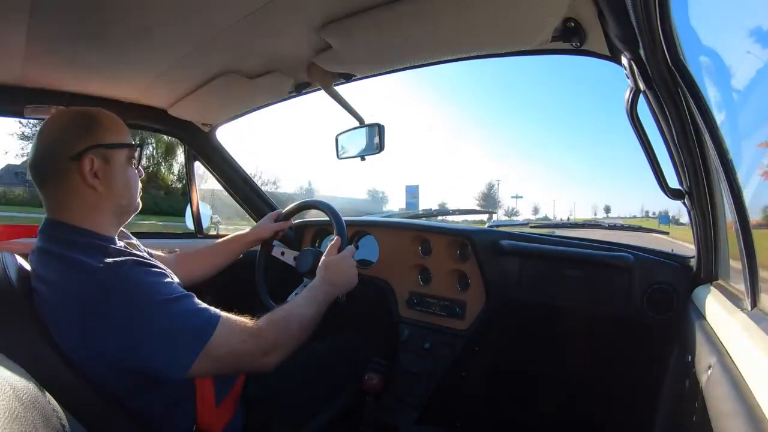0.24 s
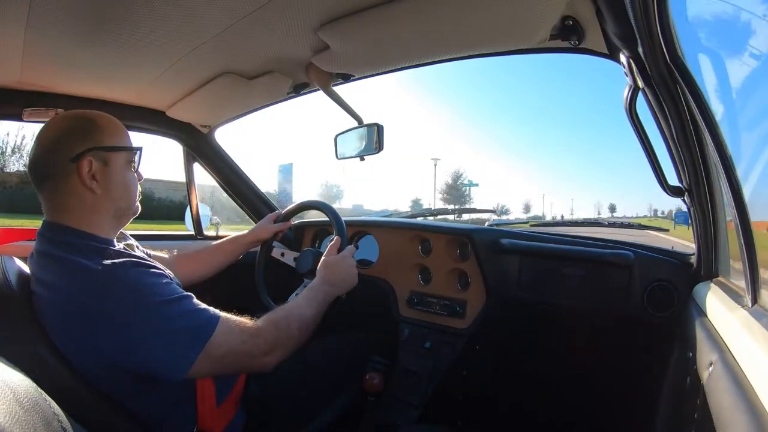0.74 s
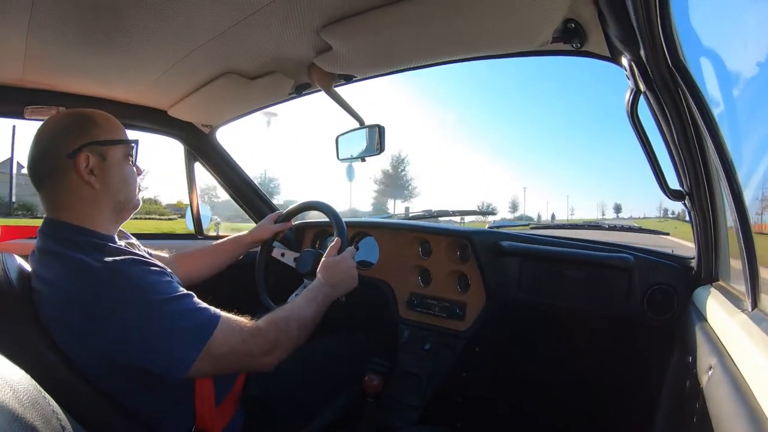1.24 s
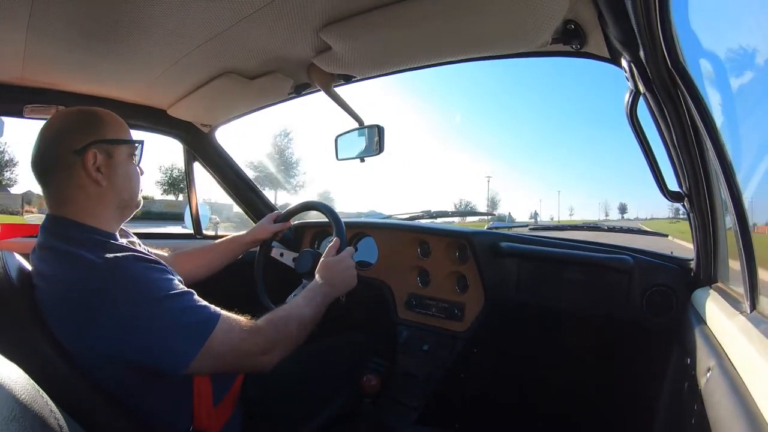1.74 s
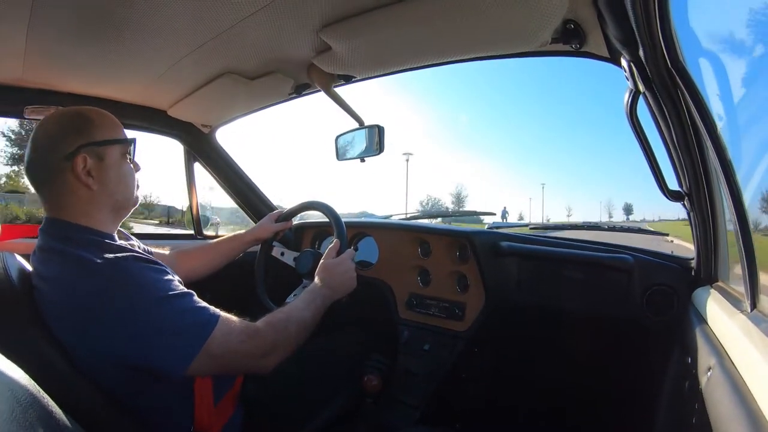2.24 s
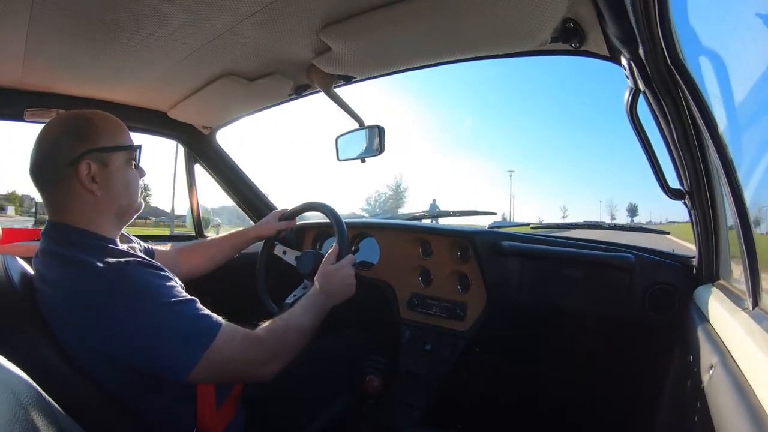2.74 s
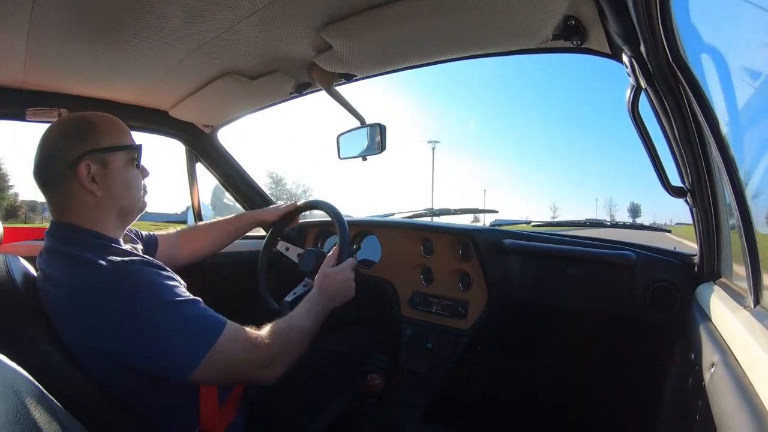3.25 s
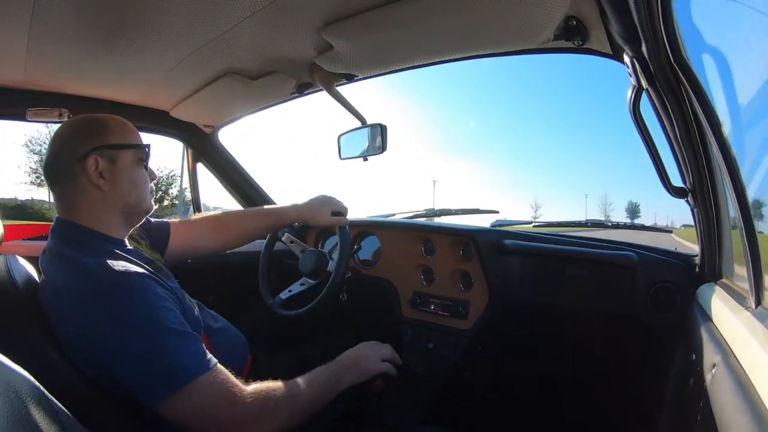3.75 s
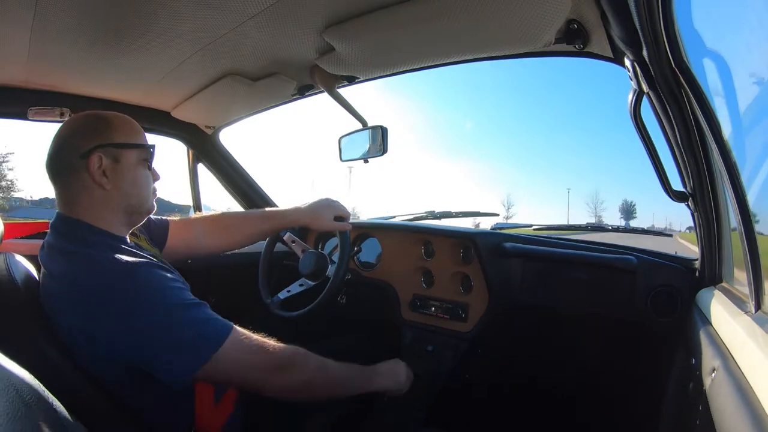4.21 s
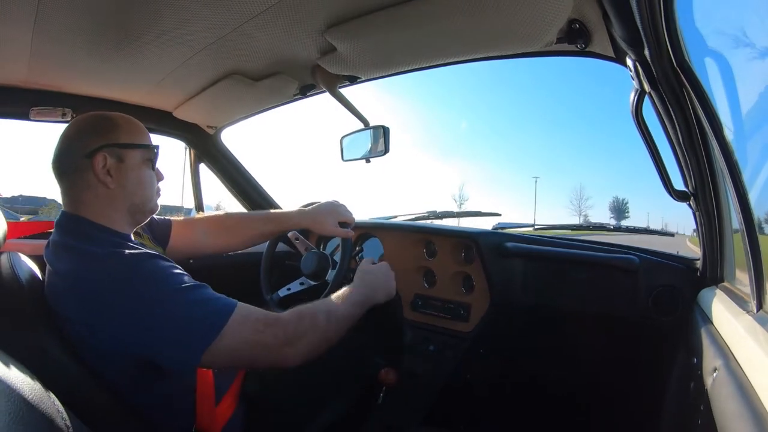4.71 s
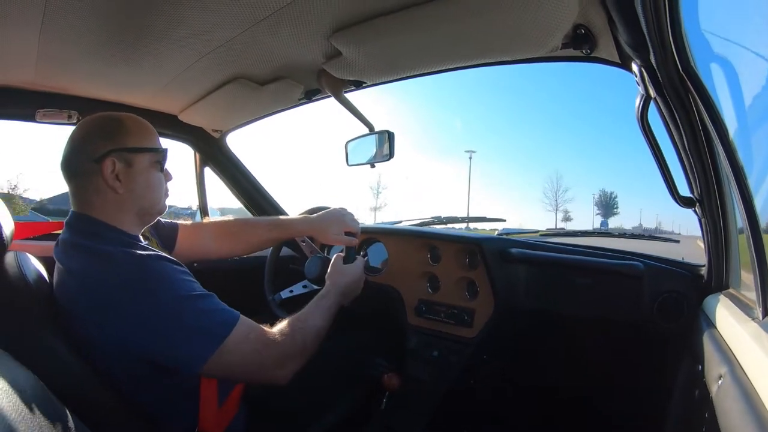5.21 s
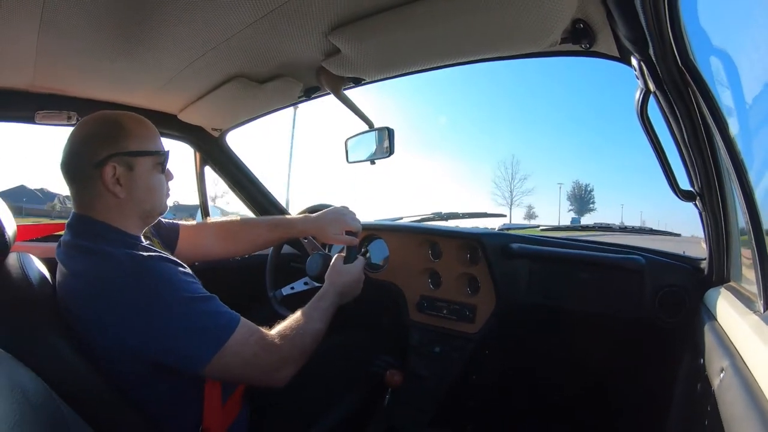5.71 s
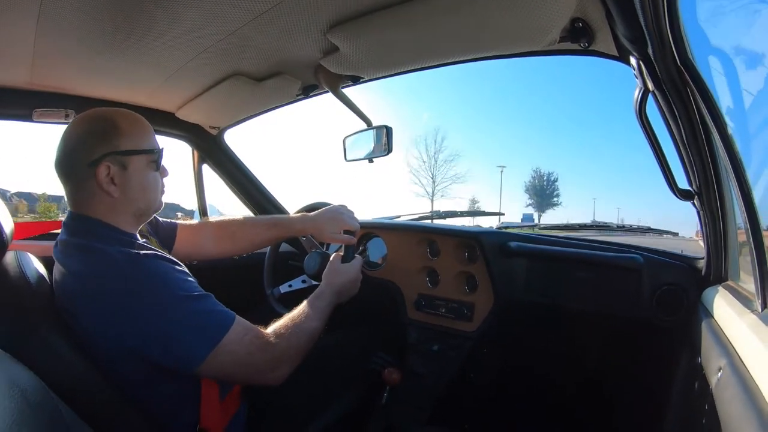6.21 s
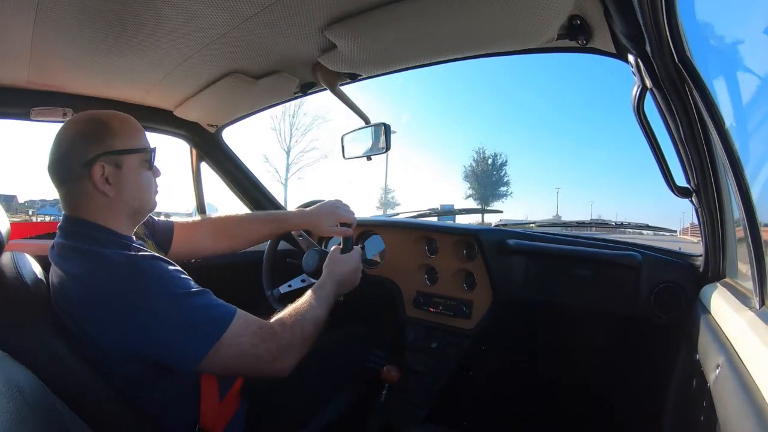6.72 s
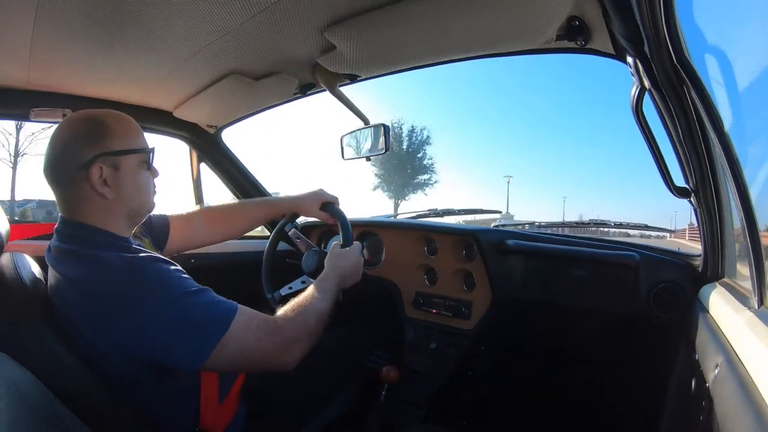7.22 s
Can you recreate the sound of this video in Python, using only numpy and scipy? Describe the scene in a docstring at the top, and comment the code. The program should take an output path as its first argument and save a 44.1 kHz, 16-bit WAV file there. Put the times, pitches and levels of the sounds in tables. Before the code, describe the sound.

A raspy flat-four engine heard from within the cabin, with tyre rumble, fan rush and faint trim ticks. It pulls steadily for two seconds, goes off throttle and drops slightly. A downshift follows: the boom thins, linkage knocks, revs jump, dip and get dragged up to a higher note, which gradually declines. Stereo microphone inside, dry and close, with short reflections from glass and dashboard.

```python
"""A flat-four engine pulls hard over deep road rumble, heard inside an old car on the road.
It is let off, blips through a downshift, then runs on at higher revs with a deep boom.
Engine, gears and intake are sums of tones locked to one crankshaft angle.
Road, fan, tyres and gulped air are shaped noise; loose trim and knocks are short decaying bursts."""
import sys
import numpy as np
from scipy import signal
from scipy.fft import rfft, irfft, next_fast_len
from scipy.io import wavfile
from scipy.ndimage import uniform_filter1d, minimum_filter1d, map_coordinates

SR = 44100
rng = np.random.default_rng(int(sys.argv[2]) if len(sys.argv) > 2 else 0)


def unload_wav(signal):
    """Save mono or channel-first audio to the path in sys.argv[1] as 16-bit WAV at rate SR, clipped to [-1, 1]."""
    wavfile.write(
        sys.argv[1],
        SR,
        np.round(np.clip(np.atleast_2d(signal).T, -1, 1) * 32767).astype(np.int16),
    )


N = 328986
T = np.arange(N) / SR
HZ = np.fft.rfftfreq(N, 1 / SR)

# Envelopes: start/s, rise/s, hold/s, fall/s
CLUTCH_OUT = (4.1, 0.364, 0.21, 0.13)  # clutch pressed for the downshift
BLIP = (4.3, 0.18, 0.2, 0.16)  # stab of throttle between gears
DRAG = (4.81, 0.51, .1, 0.31)  # wheels drag the engine up to lower-gear speed
SHUDDER = (4.05, 0.16, 0.5, .1)  # body wobble around the gear change

# Throttle opening: t/s, opening/0-1
THROTTLE = [(0, 0.99), (1.95, 0.84), (2.17, 0.52), (2.48, 0), (7.46, 0)]
# Exhaust lines; half multiples come from unequal cylinders:
# multiple of crank speed, pulling level/dB rel., light-throttle level/dB rel.
EXHAUST_ORDERS = [(2.5, -42.5, -40), (3.0, -34, -40), (3.5, -30.5, -34.5), (4.0, -27, -38.5),
                  (4.5, -26, -36.5), (5.0, -31, -41), (5.5, -35.5, -45), (6.0, -18, -33.5),
                  (6.5, -45, -43.5), (7.0, -43, -47), (7.5, -32, -37.5), (8.0, -32, -42.5),
                  (8.5, -33, -41.5), (10.0, -47, -42.5), (11.0, -37, -42.5), (12.0, -37, -36),
                  (12.5, -34.5, -41), (13.0, -44, -38.5), (14.0, -52, -39.5), (16.0, -47, -46.5),
                  (17.0, -53.5, -45)]
# Cabin response to those lines: f/Hz, gain/dB
CABIN_GAIN = [(100.0, 10), (125.0, 7), (150.0, -2.5), (175.0, -5.5), (200.0, -2), (220.0, -4.5),
              (237.0, 5.5), (256.0, -7), (266.0, -9), (300.0, -2), (340.0, -7), (400.0, -6), (470.0, -11.5),
              (620.0, -20.5), (750.0, -6.5), (900.0, -26)]
# Boom swells and dips: t/s, half width/s, level change/dB
BOOM_WAVERS = [(.43, .06, 2.5), (.57, 0.084, -3.5), (.81, 0.058, 5), (1.08, .05, -3), (1.72, .03, -1),
               (2.03, .06, 4), (2.12, .04, -4.5), (2.43, 0.042, -6.5), (2.73, .06, 2.5), (2.815, 0.014, -5),
               (3.55, .08, -0.5), (3.95, 0.18, 2.5), (4.31, 0.036, 7.5), (5.19, 0.027, -5.5),
               (6.3, 0.16, -1.2), (6.7, 0.14, 0.7)]
ORDER_SCATTER_TURNS = .45  # full range of random phase
PIPE_SMEAR_TURNS_PER_ORDER2 = .05  # the pipe delays higher orders more, smearing each throb
FLUTTER_PER_ORDER, CYCLE_SPREAD_DB = .014, 1.1  # no two cycles fire equally hard


def exhaust(speed, turns):
    """Two firings a turn boom; higher and half orders bunch into one uneven throb per camshaft turn."""
    waver_db = 0.46 * drift(rate_hz=9.9)
    for s, width, db in BOOM_WAVERS:
        waver_db = waver_db + db * np.exp(-((T - s) / width) ** 2)
    boom_gain = follow(speed, cruise_db=-17, speed_db=0.19, throttle_db=-3, clutch_db=-11, drag_db=2.5)
    boom = boom_gain * amp(waver_db) * line(2 * turns, flutter=0.031)

    shake_gain = follow(speed, cruise_db=-25, speed_db=-0.51, throttle_db=2, clutch_db=-14, drag_db=-3.5)
    shake = shake_gain * line(turns, flutter=0.33)

    throttle = curve(THROTTLE)
    rasp = 0
    for order, pulling_db, light_db in EXHAUST_ORDERS:
        db = light_db + throttle * (pulling_db - light_db) + read(CABIN_GAIN, order * speed)
        delayed = order * turns - PIPE_SMEAR_TURNS_PER_ORDER2 * order ** 2
        tone = line(delayed, flutter=FLUTTER_PER_ORDER * order, scatter=ORDER_SCATTER_TURNS)
        rasp = rasp + amp(db) * tone
    cycle_strength = np.interp(turns / 2, np.arange(N), rng.standard_normal(N))
    uneven = amp(CYCLE_SPREAD_DB * cycle_strength)
    rasp_gain = follow(speed, cruise_db=-2.5, speed_db=0.2246, throttle_db=3, clutch_db=0, drag_db=1.5)
    return boom + shake + rasp_gain * uneven * rasp


def intake(turns):
    """Air drawn in gulps roars under throttle; the blip rings the inlet at 3, 4 and 6 times crank speed."""
    band = 1 / (1 + ((HZ - 440) / 130) ** 4)
    pulsed = rng.standard_normal(N) * (1 + .5 * np.cos(4 * np.pi * turns))
    roar = amp(-40.0) * curve(THROTTLE) * unit(colour(pulsed, band))
    honk = line(4 * turns, flutter=.13, scatter=ORDER_SCATTER_TURNS)
    honk = honk + amp(-5.5) * line(3 * turns, flutter=.2, scatter=ORDER_SCATTER_TURNS)
    honk = honk + amp(-21) * line(6 * turns, flutter=0.27)
    return roar + amp(-27.5) * move(*BLIP) * honk


SHUDDER_START_HZ, SHUDDER_SAG_HZ_PER_S = 31.46, 9.9


def shudder():
    """A very low, sinking wobble of the body during the gear change."""
    hz = SHUDDER_START_HZ - SHUDDER_SAG_HZ_PER_S * np.clip(T - SHUDDER[0], 0, 1)
    return amp(-15.5) * move(*SHUDDER) * line(np.cumsum(hz) / SR, flutter=0.12)


# Hum as load comes off, and on the overrun: start/s, length/s, level/dB
HUM_SWELLS = [(1.66, 0.39, -29.5), (2.35, 0.43, -35.5), (2.8, 0.98, -38)]
HUM_REST_DB, HUM_THROTTLE_DB, HUM_RISE_S, HUM_FALL_S = -50, 6, 0.12, 0.17
# Gear whine comes and goes: start/s, length/s, level/dB
WHINE_SWELLS = [(2.08, 0.21, -54), (4.72, 0.22, -52), (5.17, .11, -53), (5.56, .45, -54), (6.87, .2, -55.5)]
WHINE_REST_DB, WHINE_RISE_S, WHINE_FALL_S = -63, 0.087, 0.064


def gears(turns):
    """Drivetrain hum at 9 times crank speed with its octave; broken tooth-mesh whine at 30 times."""
    hum_turns, mesh_turns = 9 * turns, 30 * turns
    rest_db = HUM_REST_DB + HUM_THROTTLE_DB * curve(THROTTLE)
    hum_gain = swells(HUM_SWELLS, rest_db, HUM_RISE_S, HUM_FALL_S)
    octave = amp(-16.0) * np.array([line(2 * hum_turns, flutter=0.4) for _ in range(2)])
    hum = hum_gain * (line(hum_turns, flutter=0.32) + octave)
    whine_gain = swells(WHINE_SWELLS, WHINE_REST_DB, WHINE_RISE_S, WHINE_FALL_S)
    return hum + whine_gain * line(mesh_turns, flutter=0.55, rate_hz=14)


def clatter(turns):
    """Mechanical noise: two random waveforms, each repeating every camshaft turn."""
    size = 1400  # points per camshaft turn
    place = (turns / 2 % 1) * size
    cycles = rng.standard_normal((2, size))
    return unit(np.array([map_coordinates(c, [place], order=3, mode="grid-wrap") for c in cycles]))


# Fan and tyre rush spectrum: f/Hz, level/dB rel. per Hz
RUSH_SPECTRUM = [(200, -25.5), (400, -7), (520, -0.5), (640, -1), (1000, -12), (1750, -11), (2100, -17),
                 (3100, -20), (4000, -27), (7700, -29.5), (8600, -35.5), (10300, -39), (11400, -53.5),
                 (14000, -74.5)]
# Left-right likeness before echoes: f/Hz, correlation (clipped to +-1)
EAR_LIKENESS = [(300, 1), (450, 1.1), (630, 0.54), (800, 0), (1100, 0.57), (1600, -0.07), (2600, 0.52),
                (4200, 0.57), (5400, -0.03), (7500, -0.15), (10500, 0)]
# Left-right balance before echoes: f/Hz, left minus right/dB
EAR_BALANCE = [(450, 5), (600, 2.5), (740, -5), (820, -1), (950, -5), (1100, -1), (1250, -1.5), (1700, 0.5),
               (2800, -2), (4100, 0), (6300, -5), (7700, -0.5), (8600, -1.5), (10000, 6)]
# Brief swells of the air rush: start/s, length/s, extra level/dB
GUSTS = [(0, 0.56, 0.6), (1.98, .15, 0.4), (2.955, 0.39, 1.1), (6.498, 0.66, 0.8)]
GUST_RISE_S, GUST_FALL_S = 0.061, 0.06


def rush(speed, turns):
    """Fan and tyre noise over engine clatter, throbbing with the firings and peppered by valve taps."""
    throb = 1 + 0.081 * np.cos(4 * np.pi * turns)
    throb = throb + 0.064 * np.cos(2 * np.pi * turns) + 0.066 * np.cos(np.pi * turns)
    valve, since = np.divmod(4 * turns, 1)  # four taps a turn; since = fraction of tap interval
    tap_strength = amp(2 * rng.standard_normal(N)[valve.astype(int)])
    taps = tap_strength * np.exp(-since / 0.5)
    cyclic = colour(clatter(turns), amp(-7.5) * HZ / (HZ + 350) / (1 + (HZ / 2800) ** 2))
    left, other = (rng.standard_normal((2, N)) + cyclic) * (throb + 0.19 * taps)

    same = np.clip(read(EAR_LIKENESS, HZ), -1, 1)
    right = colour(left, same) + colour(other, np.sqrt(1 - same ** 2))
    shape = amp(read(RUSH_SPECTRUM, HZ)) * panels()
    lean = amp(read(EAR_BALANCE, HZ) / 2)
    pair = np.array([colour(left, shape * lean), colour(right, shape / lean)])
    noise = flicker(unit(reflect(pair, echo_db=-14.0, decay_s=0.0069)))

    gusts_db = .3 * drift(rate_hz=8) + bursts_db(GUSTS)
    gain = follow(speed, cruise_db=-35.5, speed_db=0.0687, throttle_db=2.5, clutch_db=0, drag_db=2)
    return noise * gain * amp(gusts_db)


def reflect(pair, echo_db, decay_s):
    """Adds short, dense echoes of glass and dashboard, different at each ear."""
    age = T[:SR // 20]
    taps = rng.standard_normal((2, len(age))) * (age > .002) * np.exp(-age / decay_s)
    taps /= np.linalg.norm(taps, axis=1, keepdims=True)
    return pair + amp(echo_db) * signal.oaconvolve(pair, taps, axes=1)[:, :N]


# Treble-only swells: start/s, length/s, extra level/dB
SIZZLES = [(.38, .12, 1.5), (.76, .09, 1.5), (1.15, 0.13, 2), (1.48, .15, 2), (1.99, .13, 1.3),
           (3.08, .1, 0.5), (4.33, 0.18, 1.7), (5.4, .25, 0)]
SIZZLE_HZ = 4500


def flicker(pair):
    """The treble of the rush wavers on its own and sizzles up in short swells."""
    treble = colour(pair, HZ ** 2 / (HZ ** 2 + SIZZLE_HZ ** 2))
    db = -.4 + 0.43 * drift(rate_hz=10) + bursts_db(SIZZLES)
    return pair + treble * (amp(db) - 1)


# Road rumble spectrum through the floor: f/Hz, level/dB rel. per Hz
ROAD_SPECTRUM = [(5, -38), (13, -23), (21, -1.5), (31, 1.5), (43, -7.5), (56, -6), (75, -11), (118, -10),
                 (150, -15.5), (240, -21.5), (340, -25), (420, -28), (500, -37), (700, -85.5)]
# Rough stretches: start/s, length/s, rumble gain/dB
BUMPS = [(0, 0.2, -21), (.43, 0.17, -10.5), (.92, 0.69, -16), (2.05, 0.36, -12), (3.12, 0.51, -17),
         (4.1, 0.69, -19.5), (5.45, 0.31, -19), (7.05, 0.13, -11)]
SMOOTH_ROAD_DB, BUMP_RISE_S, BUMP_FALL_S = -18, 0.073, .1


def road():
    """Tyres shake the floor, nearly alike at both ears; the lowest part swells on rough stretches."""
    spectrum = amp(read(ROAD_SPECTRUM, HZ)) * panels()
    common, apart = colour(rng.standard_normal((2, N)), spectrum)
    noise = unit(common + amp(-22.5) * np.array([apart, -apart]))
    deep = colour(noise, 1 / (1 + (HZ / 48) ** 6))
    drone_db = -20.0 + .4 * curve(THROTTLE) - 0.99 * move(*CLUTCH_OUT) + .6 * drift(rate_hz=8)
    drone = (noise - deep) * amp(drone_db)
    rumble = deep * swells(BUMPS, SMOOTH_ROAD_DB, BUMP_RISE_S, BUMP_FALL_S)
    return (rumble + drone) * amp([[-.2], [.2]])


# Suspension knocks and a gear-change cluster:
# t/s, clunk level/dB, decay/s, ring f/Hz, ring level/dB
KNOCKS = [(1.199, -37, 0.0055, 750, -17), (2.272, -50, .02, 165, -20), (2.325, -34, 0.087, 570, -35),
          (4.065, -50, 0.071, 242.7, -23), (4.18, -34, 0.016, 500, -42), (4.285, -44, .025, 350, -26),
          (4.322, -41, 0.027, 270, -20.5), (4.372, -43, .025, 402, -26), (4.398, -31.5, .014, 528, -38),
          (7.071, -46, .008, 760, -23)]
# Clunk spectrum: f/Hz, level/dB rel.
KNOCK_SPECTRUM = [(150, -22.5), (400, 13.5), (1200, 1.5), (3800, -10), (6000, -24.5), (11000, -46),
                  (14000, -70)]
CLUNK_RISE_S, RING_RISE_S = .0015, .004


def knocks():
    """Dull, padded clunks of suspension and shift linkage, each setting one panel ringing."""
    body = unit(colour(rng.standard_normal((2, N)), amp(read(KNOCK_SPECTRUM, HZ))))
    out = np.zeros((2, N))
    for s, db, decay, ring_hz, ring_db in KNOCKS:
        age = np.maximum(T - s, 0)
        clunk = amp(db) * body * np.minimum(age / CLUNK_RISE_S, 1)
        ring = amp(ring_db) * (1 - np.exp(-age / RING_RISE_S)) * np.sin(2 * np.pi * ring_hz * age)
        out += (clunk + ring) * np.exp(-age / decay)
    return out


# Loose-trim ticks: t/s, level/dB before filtering, left minus right/dB
TICKS = [(.423, -48, 1), (1.612, -45, 2), (1.885, -46, -2), (2.09, -50, 0), (2.3905, -35, 0),
         (2.407, -49, 0), (2.876, -47, 2), (6.69, -45, 1), (7.007, -48, 0)]
# Tick filter: f/Hz, gain/dB
TICK_SPECTRUM = [(1500, -21), (4000, -10), (6500, -2), (8000, -0.5), (10400, -2.5), (11800, -24.5),
                 (13500, -18), (15000, -30)]


def trim():
    """Dry, bright noise ticks with a short scatter round the cabin."""
    out = np.zeros((2, N))
    for s, db, pan_db in TICKS:
        age = np.maximum(T - s, 0)
        burst = (T > s) * (np.exp(-age / 0.0022) + 0.25 * np.exp(-age / .02))
        out += amp(db + np.array([[pan_db], [-pan_db]]) / 2) * burst
    return colour(out * rng.standard_normal((2, N)), amp(read(TICK_SPECTRUM, HZ)))


# Panel and glass resonances: f/Hz, width/Hz, gain/dB
PANELS = [(235, 75, 2.5), (313, 28, 3), (410.3, 29, 6.5), (560, 29, 2.5), (616, 86, -4.5), (753, 104, 5.5),
          (906, 55, 6), (1046, 100, 2.5), (1208, 200, 5.5), (2430, 470, 2)]


def panels():
    """Gain of the cabin's resonances on the grid HZ."""
    return amp(sum(db / (1 + (2 * (HZ - hz) / width) ** 2) for hz, width, db in PANELS))


CRUISE_TURNS_PER_S = 44


def follow(speed, cruise_db, speed_db, throttle_db, clutch_db, drag_db):
    """Layer gain: dB at cruise, per extra turn/s, at full throttle, with clutch out, when dragged."""
    db = cruise_db + speed_db * (speed - CRUISE_TURNS_PER_S) + throttle_db * curve(THROTTLE)
    return amp(db + clutch_db * move(*CLUTCH_OUT) + drag_db * move(*DRAG))


def line(turns, flutter, scatter=1, rate_hz=8):
    """Tone of about rms 1, wavering in strength and phase; low scatter keeps it near its neighbours' phase."""
    angle = 2 * np.pi * (turns + scatter * (rng.random() - .5))
    strength, skew = drift(rate_hz), drift(rate_hz)
    return np.sqrt(2) * ((1 + flutter * strength) * np.cos(angle) + flutter * skew * np.sin(angle))


def drift(rate_hz):
    """Slow random signal of rms 1, up to about the given rate."""
    count = 2048
    lowpass = 1 / (1 + (np.fft.rfftfreq(count, T[-1] / count) / rate_hz) ** 2)
    slow = irfft(rfft(rng.standard_normal(count)) * lowpass)
    return np.interp(T, np.linspace(0, T[-1], count), unit(slow))


def move(start, rise, hold, fall):
    """Envelope 0-1: rise, hold, fall."""
    rising = (T - start) / rise
    falling = 1 - (T - start - rise - hold) / fall
    return np.clip(np.minimum(rising, falling), 0, 1)


def swells(rows, rest_db, rise, fall):
    """Resting gain with swells added in power, sharing one rise and one fall."""
    power = sum((amp(db) * move(start, rise, length - rise, fall)) ** 2 for start, length, db in rows)
    return np.sqrt(amp(rest_db) ** 2 + power)


def bursts_db(rows):
    """Sum of brief level rises in dB."""
    return sum(db * move(s, GUST_RISE_S, length - GUST_RISE_S, GUST_FALL_S) for s, length, db in rows)


def amp(db):
    """Decibels to gain."""
    return 10 ** (np.asarray(db) / 20)


def unit(x):
    """Scales to rms 1."""
    return x / np.sqrt(np.mean(x ** 2) + 1e-20)


def curve(rows):
    """A time table at every sample."""
    return np.interp(T, *np.transpose(rows))


def read(points, hz):
    """A spectrum table on a log-frequency axis."""
    f, value = np.transpose(points)
    return np.interp(np.log(hz + 1), np.log(f), value)


def colour(x, gain):
    """Filters by a gain given on the grid HZ."""
    size = next_fast_len(N, True)
    size_gain = np.interp(np.fft.rfftfreq(size, 1 / SR), HZ, gain)
    return irfft(rfft(x, size) * size_gain, size)[..., :N]


# Crankshaft speed: t/s, speed/turns per s
CRANK = [(0.0, 43.56), (0.4, 43.77), (1.6, 44.25), (2.0, 44.2), (2.5, 43.54), (3.2, 42.55), (3.95, 41.44),
         (4.25, 39.02), (4.42, 48.4), (4.6, 51.0), (4.85, 49.03), (5.08, 51.48), (5.35, 57.84),
         (5.7, 56.29), (6.6, 53.77), (7.0, 52.65), (7.46, 51.62)]


def scene():
    """The crankshaft, turning a little unevenly, drives every engine sound."""
    speed = curve(CRANK)
    turns = np.cumsum(speed * (1 + 0.001994 * drift(rate_hz=8.2))) / SR
    bass = (exhaust(speed, turns) + intake(turns) + shudder()) * amp([[-.2], [.2]])
    return bass + gears(turns) + rush(speed, turns) + road() + knocks() + trim()


BASS_HZ, LIMIT_DB, LIMIT_WINDOW, EDGE_HZ = 190, -7.3, 700, 14900  # window in samples


def record(dry):
    """Soft ends; a fast, soft-kneed limiter holds down the bass alone; then the band limit."""
    dry = dry * np.clip(np.minimum(T, T[-1] - T) / .006, 0, 1)
    bass = colour(dry, 1 / (1 + (HZ / BASS_HZ) ** 4))
    needed = (1 + (abs(bass).max(0) / amp(LIMIT_DB)) ** 8) ** (-1 / 8)
    gain = uniform_filter1d(minimum_filter1d(needed, size=LIMIT_WINDOW), size=LIMIT_WINDOW)
    held = dry - bass * (1 - gain)
    lowpass = signal.firwin(511, EDGE_HZ, window=("kaiser", 9), fs=SR)
    return signal.oaconvolve(held, lowpass[None], "same")


dry = scene()
out = record(dry)
unload_wav(out)
```